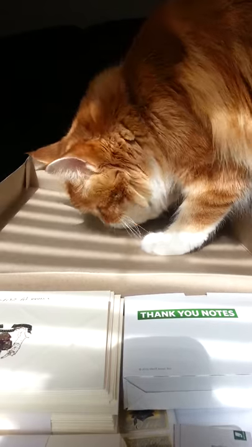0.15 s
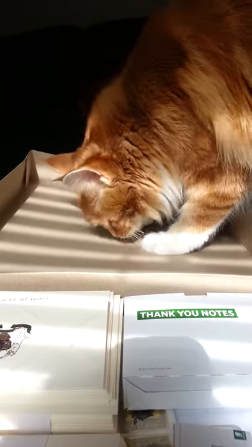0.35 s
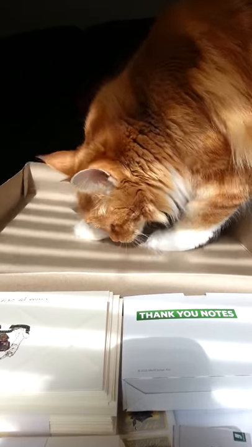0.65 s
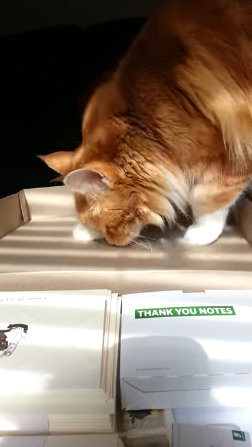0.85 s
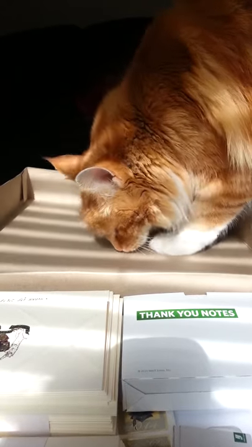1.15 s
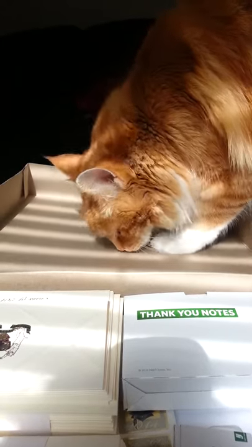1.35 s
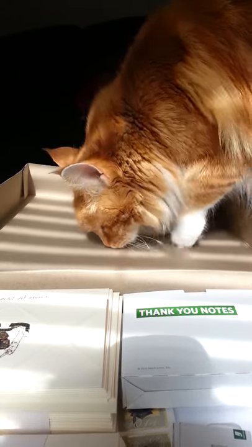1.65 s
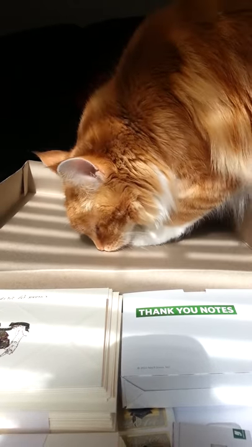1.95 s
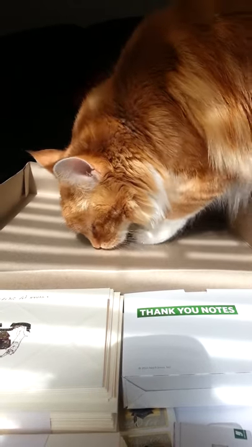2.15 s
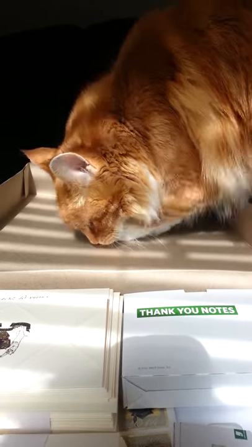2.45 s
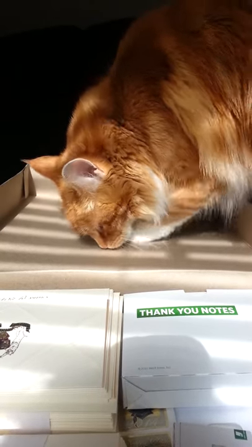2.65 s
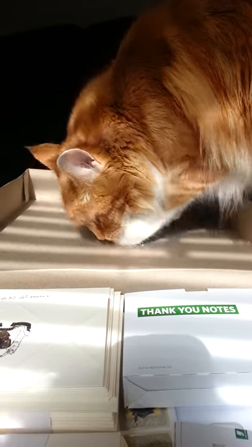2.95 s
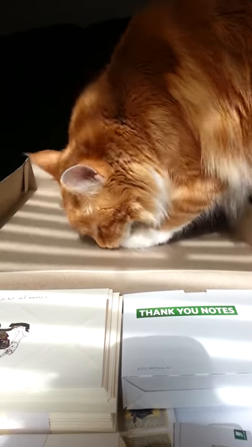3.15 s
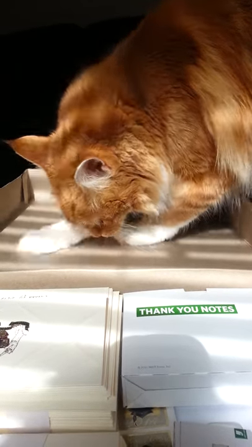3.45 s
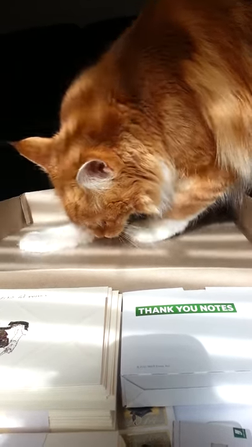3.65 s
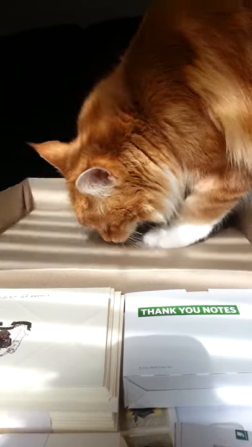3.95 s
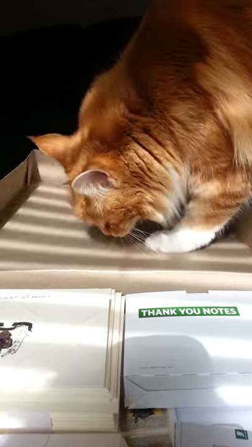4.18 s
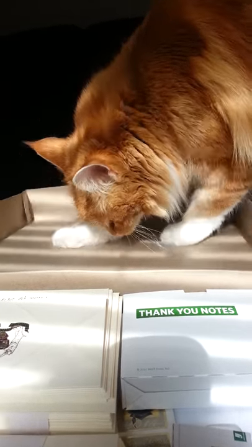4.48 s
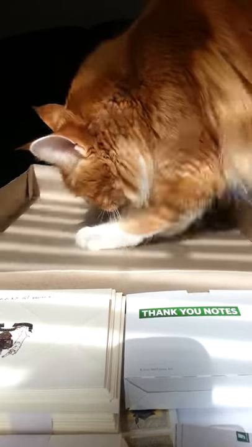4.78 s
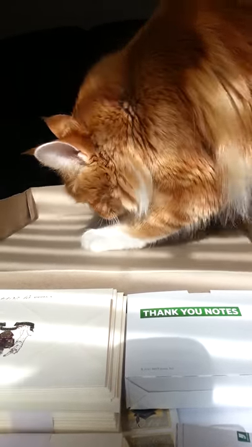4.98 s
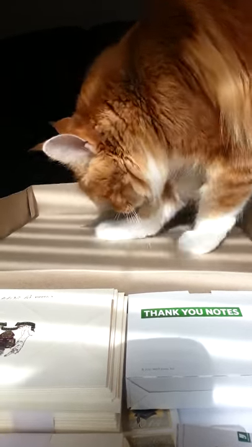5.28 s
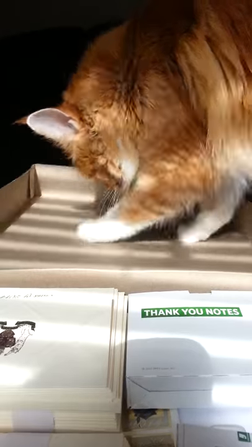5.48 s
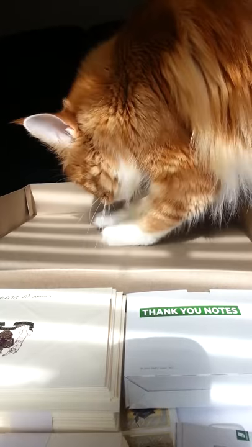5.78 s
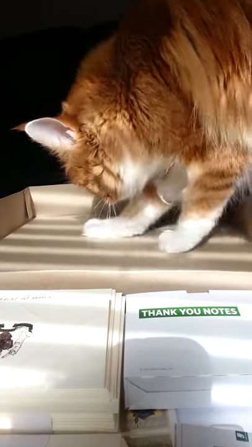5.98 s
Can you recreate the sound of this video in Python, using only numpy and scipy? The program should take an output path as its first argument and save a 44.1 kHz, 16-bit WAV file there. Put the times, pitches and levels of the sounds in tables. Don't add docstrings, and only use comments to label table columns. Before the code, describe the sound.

Close, dry scratching of cat claws and pads on cardboard, sparse at first, then busier and louder, over a faint room hum and hiss.

```python
import sys
import numpy as np
from scipy import signal
from scipy.fft import rfft, irfft, next_fast_len
from scipy.io import wavfile
from scipy.ndimage import uniform_filter1d

SR = 44100
rng = np.random.default_rng(int(sys.argv[2]) if len(sys.argv) > 2 else 0)


def linear_from_db(decibels):
    return 10 ** (np.asarray(decibels, float) / 20)


def file_out(sig):
    cols = np.atleast_2d(sig).T
    lim = np.clip(cols, -1, 1)
    pcm = np.round(lim * 32767).astype(np.int16)
    wavfile.write(sys.argv[1], SR, pcm)


N = 269892


def rms_one(x):
    return x / np.sqrt(np.mean(x ** 2) + 1e-20)


def drift(rate):
    hop = 40
    pole = np.exp(-2 * np.pi * rate * hop / SR)
    noise = rng.standard_normal(N // hop + 2002)
    slow = signal.lfilter([1], [1, -2 * pole, pole * pole], noise)[2000:]
    return np.interp(np.arange(N) / hop, np.arange(len(slow)), rms_one(slow))


def grains(size, per_s, spread_db):
    heights = linear_from_db(spread_db * np.minimum(rng.exponential(1, size), 4))
    signs = rng.choice([-1, 1], size)
    return heights * signs * (rng.random(size) < per_s / SR) + 1e-18


def resonate(x, hz, width_hz):
    r = np.exp(-np.pi * width_hz / SR)
    poles = [1, -2 * r * np.cos(2 * np.pi * hz / SR), r * r]
    return signal.lfilter([(1 - r * r) / 2, 0, (r * r - 1) / 2], poles, x)


def ring(push, hz, t60_s):
    r, w = linear_from_db(-60 / (t60_s * SR)), 2 * np.pi * hz / SR
    return signal.lfilter([0, np.sin(w)], [1, -2 * r * np.cos(w), r * r], push)


def colour(x, points):
    hz, db = np.transpose(points)
    size = next_fast_len(N)
    bins_hz = np.arange(1, size // 2 + 2) * SR / size
    gain_db = np.interp(np.log(bins_hz), np.log(hz), db)
    return rms_one(irfft(rfft(x, size) * linear_from_db(gain_db), size)[:N])


def add(out, at_s, sound):
    start = round(at_s * SR)
    out[start:start + len(sound)] += sound[:N - start]


def tone(hz, level_db):
    phase = 2 * np.pi * np.cumsum(hz + np.zeros(N)) / SR
    return linear_from_db(level_db) * np.sqrt(2) * np.sin(phase)


def background():
    # frequency in Hz, density in dB per Hz.
    quiet = [(20, -47), (45, -19), (90, -8), (200, -4.5), (300, -8.5), (470, -9.5), (900, -20.5),
             (1800, -22.5), (3500, -26), (4800, -27), (6300, -29.5), (8500, -26), (12000, -26.5),
             (14700, -26.5)]
    # frequency in Hz, width in Hz, rms level in dB.
    drones = [(116.4, 11, -84), (206.6, 77, -67.5), (225.6, 18, -71.5), (300.4, 77, -69)]
    out = linear_from_db(-53) * colour(rng.standard_normal(N), quiet)
    out += tone(120, -61.5 + 1.3 * drift(6))
    out += tone(198 + 3 * drift(8.1), -61.5 + 1.5 * drift(8))
    white = rng.standard_normal(N)
    for hz, width_hz, level_db in drones:
        narrow = resonate(resonate(white, hz, width_hz), hz, width_hz)
        out += linear_from_db(level_db) * rms_one(narrow)
    return out


def ducking(foreground):
    from_db, slope_db_per_db, span_db = -55, 0.19, 14
    level_db = 10 * np.log10(uniform_filter1d(foreground ** 2, size=4410) + 1e-12)
    return linear_from_db(-slope_db_per_db * np.clip(level_db - from_db, 0, span_db))


def room(x):
    t60_s, wall_cut_hz, gap_s = 0.11, 2200, 0.003
    t = np.arange(SR // 4) / SR
    dull = np.exp(-2 * np.pi * wall_cut_hz / SR)
    tail = signal.lfilter([1], [1, -dull], rng.standard_normal(len(t)))
    tail = tail * linear_from_db(-60 * t / t60_s) * (t > gap_s)
    return signal.fftconvolve(x, tail / np.sqrt(np.sum(tail ** 2)))[:N]


def struck(rows, contact_s, rattle_db):
    out, t = np.zeros(N), np.arange(SR // 4) / SR
    contact = np.sin(np.pi * np.minimum(t / contact_s, 1)) ** 2 * 2 / (contact_s * SR)
    for at_s, level_db, first_hz, second_hz, second_db, t60_s in rows:
        rattle = linear_from_db(rattle_db - 25 * t / t60_s) * rng.standard_normal(len(t))
        push = contact + rattle
        modes = ring(push, first_hz, t60_s) + linear_from_db(second_db) * ring(push, second_hz, t60_s)
        add(out, at_s, linear_from_db(level_db) * modes)
    return out


def bumps():
    # time in seconds, peak in dB, first mode in Hz, second mode in dB, t60 in seconds.
    bump_rows = [(0.990, -44, 148, -11, .061), (2.850, -47, 260, 2, .06), (3.505, -36, 347, -18, 0.041),
                 (3.859, -31, 216, -18, 0.092), (3.864, -26.5, 302, -9.5, 0.054),
                 (3.9664, -21.5, 235, -2, 0.11), (3.991, -25, 308, -7, 0.02),
                 (4.624, -36.5, 193, -20, 0.058), (4.846, -32, 236, -2, .065),
                 (5.565, -31.5, 173, -10, 0.054), (5.5646, -25, 360, -18, 0.038)]
    mode_ratio = 1.3
    rows = [(at_s, level_db, hz, mode_ratio * hz, second_db, t60_s)
            for at_s, level_db, hz, second_db, t60_s in bump_rows]
    return struck(rows, contact_s=0.0015, rattle_db=-35.5)


def snaps():
    # time in seconds, peak in dB, first mode in Hz, second mode in Hz, second mode in dB.
    snap_rows = [(0.283, -41.5, 2560, 4200, -5), (0.729, -56, 1500, 3000, -6),
                 (2.5782, -21, 2000, 3500, -25), (2.820, -32, 600, 1600, -4.5),
                 (2.830, -34, 1340, 2300, -4), (2.8316, -26, 514, 910, -16), (3.4988, -19, 1590, 3700, -11),
                 (2.0262, -36, 2520, 4970, -2), (2.0335, -30.5, 890, 1800, -0.5),
                 (4.3554, -23, 1780, 4200, -4.5), (4.3564, -15.5, 1830, 1460, -3),
                 (4.6255, -32, 2500, 3800, -12), (5.5634, -32, 6900, 4600, -5),
                 (3.4987, -40, 7500, 2920, 10), (5.5624, -16.5, 3040, 1330, -3),
                 (5.685, -40.5, 2000, 2300, -6)]
    t60_s = 0.012
    return struck([(*row, t60_s) for row in snap_rows], contact_s=0.0001, rattle_db=-29)


def rakes():
    # peak time in seconds, rms level in dB, fall in seconds,
    # flute resonance in Hz, brightness in dB.
    swells = [(0.119, -51, 0.029, 3930, -7), (0.728, -56, 0.034, 2500, 3), (1.031, -44.5, 0.039, 1500, -3),
              (1.610, -48.5, 0.019, 2700, -6.5), (1.629, -40, .016, 1680, -4),
              (2.567, -37.5, .012, 1900, -2), (2.585, -36, 0.025, 1900, -5), (2.587, -39, 0.014, 1070, -11),
              (4.3711, -26.5, 0.0087, 1780, -15.5), (4.652, -39, 0.051, 1420, 1),
              (4.671, -33.5, 0.014, 1600, 8), (4.820, -40, .008, 3050, -6)]
    flicks = [(2.015, -43.5, 0.016, 4670, -1), (2.028, -41, 0.029, 1020, -5),
              (2.089, -46.5, .0018, 2520, -1), (3.208, -36, 0.019, 2150, -9.5), (3.232, -59, 0.06, 1670, 0),
              (3.502, -47, 0.0073, 2700, 2), (3.508, -41, 0.0094, 1000, -9), (3.8973, -32, 0.022, 2100, 10),
              (4.1009, -28, 0.0089, 2120, -6), (4.1416, -24.5, 0.014, 3700, 0),
              (4.3632, -26, 0.0051, 1900, -16), (4.675, -30, 0.0052, 2700, -26),
              (5.5643, -25, .0039, 2630, 29), (5.570, -37.5, 0.022, 550, 1)]
    # frequency in Hz, width in Hz, level in dB.
    board_modes = [(600, 1030, -3.5), (1030, 420, -1), (1900, 520, 0), (2700, 980, 3), (3700, 810, 5.5),
                   (4600, 2800, -1), (7500, 2700, -2.5), (11500, 13000, -46)]
    rise_per_fall, flick_rise_s = 0.59, 0.0033
    out, t = np.zeros(N), np.arange(SR // 6) / SR
    rows = [(rise_per_fall * row[2], *row) for row in swells]
    rows += [(flick_rise_s, *row) for row in flicks]
    for rise_s, peak_s, level_db, fall_s, flute_hz, bright_db in rows:
        rise = (t / rise_s) ** 0.77
        fall = np.exp(-(np.maximum(t - rise_s, 0) / fall_s) ** 1.7)
        effort = np.where(t < rise_s, rise, fall)
        clicks = grains(len(t), per_s=5500, spread_db=3.0)
        flute = rms_one(resonate(resonate(clicks, flute_hz, width_hz=340), flute_hz, width_hz=1300))
        board = np.zeros(len(t))
        for k, (hz, width_hz, db) in enumerate(board_modes):
            board += (-1) ** k * linear_from_db(db) * rms_one(resonate(clicks, hz, width_hz))
        torn = rms_one(effort * (flute + linear_from_db(bright_db) * board))
        add(out, peak_s - rise_s, linear_from_db(level_db) * np.sqrt(np.mean(effort ** 2)) * torn)
    return out


def board_ring(x):
    t60_s, level_db = 0.02, -7
    out, step, t = x.copy(), SR // 18, np.arange(SR // 20) / SR
    window = np.sin(np.pi * np.arange(2 * step) / (2 * step))
    for start in range(0, N, step):
        modes = rng.standard_normal(len(t)) * linear_from_db(-60 * t / t60_s)
        piece = x[start:start + 2 * step]
        rung = signal.fftconvolve(piece * window[:len(piece)], modes / np.sqrt(np.sum(modes ** 2)))
        add(out, start / SR, linear_from_db(level_db) * rung)
    return out


def pressure_and_claws():
    # start in seconds, end in seconds, start pressure in dB, end pressure in dB,
    # claw share in dB.
    stroke_rows = [(0, 0.096, -59, -57, -2), (0.1, 0.344, -51.5, -63, -1), (0.46, 0.585, -58.5, -52.5, -2),
                   (0.687, 0.797, -57.5, -56, -1), (.81, 0.915, -49, -52.5, -2),
                   (1.004, 1.356, -54, -57.5, 0.5), (2.06, 2.225, -74, -63, -2),
                   (2.602, 2.877, -55.5, -51.5, -1), (3.073, 3.10, -60.5, -61, -3.5),
                   (3.17, 3.249, -56.5, -49.5, 1), (3.42, 3.548, -66, -57.5, -0.5),
                   (3.572, 3.845, -56, -50.5, -1.5), (3.861, 4.075, -44.5, -48, 2),
                   (4.07, 4.145, -46, -41, -0.5), (4.18, 4.265, -57, -65, 0.5), (4.42, 4.61, -57, -53, -1),
                   (4.645, 4.79, -47, -46.5, 2), (4.803, 4.893, -42.5, -44.5, -1),
                   (5.083, 5.183, -50, -49.5, 1.5), (5.169, 5.356, -46, -48, 0),
                   (5.396, 5.56, -47, -41.5, 2), (5.58, 5.68, -54, -54, -0.5),
                   (5.814, 5.925, -46.5, -51, 2), (5.898, 6.099, -46, -53, 1.5)]
    land_db_per_s, lift_db_per_s, arch_db = 434, 373, 2.5
    rest_db, settle_s = -69, 0.04
    t = np.arange(0, N, 32) / SR
    power, claws, progress = linear_from_db(2 * rest_db) + 0 * t, 0, 0
    for start_s, end_s, start_db, end_db, claw_db in stroke_rows:
        along = np.clip((t - start_s) / (end_s - start_s), 0, 1)
        settled = 1 - np.exp(-np.maximum(t - start_s, 0) / settle_s)
        db = start_db + (end_db - start_db) * along + arch_db * np.sin(np.pi * along)
        db -= land_db_per_s * np.maximum(start_s - t, 0)
        db -= lift_db_per_s * np.maximum(t - end_s, 0)
        weight = linear_from_db(2 * db)
        power = power + weight
        claws = claws + claw_db * weight
        progress = progress + settled * weight
    curves = (10 * np.log10(power), claws / power, progress / power)
    return [np.interp(np.arange(N) / SR, t, curve) for curve in curves]


def shoves_db():
    # time in seconds, length in seconds, gain in dB.
    shove_rows = [(0.334, 0.066, 5), (0.623, 0.033, 7), (.72, 0.055, 8), (1.27, 0.045, 6.5),
                  (2.077, .05, 8), (3.33, 0.065, 4.5), (3.563, 0.15, 4.5), (4.237, 0.1, 6.5),
                  (4.488, .06, 3.5), (4.963, .05, 5), (5.222, 0.031, 2.5), (5.777, 0.024, 4),
                  (5.954, 0.049, 5.5), (6.093, 0.092, 4)]
    t = np.arange(N) / SR
    return sum(db * np.exp(-((t - at_s) / length_s) ** 2) for at_s, length_s, db in shove_rows)


def strokes():
    # frequency in Hz, density in dB per Hz.
    rasp_spectrum = [(700, -11.5), (1000, -8.5), (1500, 0), (2100, 1), (2400, -2.5), (2750, 1),
                     (3100, -5.5), (3600, -23.5)]
    squeak_spectrum = [(2600, -30), (3050, -10.5), (3350, -4.5), (3650, -1), (3950, -4), (4400, -4),
                       (4900, -8.5), (6000, -29)]
    fur_spectrum = [(3500, -19), (5000, 1), (6200, 1.5), (7800, 3), (9700, 0), (13400, 0), (14400, -3),
                    (14700, -1.5)]
    drag_spectrum = [(60, -60), (150, -22), (300, 0), (500, -6), (900, -4.5), (1300, -9.5), (2000, -24)]
    usual_db = -51.5
    press_db, claw_db, settled = pressure_and_claws()

    def layer_db(at_usual_db, per_press_db, per_claw_db, settling_db):
        pressed_db = at_usual_db + per_press_db * (press_db - usual_db)
        return pressed_db + per_claw_db * claw_db + settling_db * settled

    rasp_db = layer_db(-51.5, 0.7167, 1.5, -1)
    squeak_db = layer_db(-54, 1.0, 0.14, -0.3)
    fur_db = layer_db(-52.5, 1.1669, -0.2, 1.5)
    drag_db = layer_db(-56, 0.39, -0.4, 1) + shoves_db()
    uneven = drift(6.7)
    fibres = board_ring(grains(N, per_s=6000, spread_db=0.5))
    hairs = grains(N, per_s=20000, spread_db=2.0)
    rasp = colour(fibres, rasp_spectrum) * linear_from_db(rasp_db + 0.18 * uneven + 1.4 * drift(60))
    squeak = colour(fibres, squeak_spectrum) * linear_from_db(squeak_db + 0.077 * uneven + 0.64 * drift(50))
    fur = colour(hairs, fur_spectrum) * linear_from_db(fur_db + 1.4 * uneven)
    drag = colour(rng.standard_normal(N), drag_spectrum) * linear_from_db(drag_db + 1.85 * drift(17))
    return rasp + squeak + fur + drag


def scene():
    mic_low_cut = signal.butter(3, 101, "high", fs=SR, output="sos")
    hits = signal.sosfilt(mic_low_cut, rakes() + snaps() + bumps())
    paws = strokes()
    room_db = -15
    mono = hits + linear_from_db(room_db) * room(hits) + paws + ducking(paws) * background()
    return np.array([mono, mono])


def splits(x):
    # time in seconds, band centre in Hz.
    split_rows = [(.055, 7500), (.055, 10300), (.17, 11300), (.96, 11600), (1.425, 9600), (1.775, 13000),
                  (2.67, 7500), (2.68, 4600), (4.765, 4850), (4.765, 10600), (4.765, 13700), (5.03, 12400),
                  (5.19, 8200), (5.42, 4600), (5.98, 12000)]
    half_hz, level_db, size = 750, -3, 1500
    out, window = np.zeros(N), signal.windows.tukey(size, 0.6)
    for at_s, hz in split_rows:
        band = signal.butter(6, [hz - half_hz, hz + half_hz], "band", fs=SR, output="sos")
        start = round(at_s * SR) - size // 2
        strength = np.std(signal.sosfilt(band, x[start:start + size]))
        noise = rms_one(signal.sosfilt(band, rng.standard_normal(size)))
        add(out, start / SR, linear_from_db(level_db) * strength * window * noise)
    return out


def band_limit(x):
    return signal.sosfilt(signal.butter(12, 14850, fs=SR, output="sos"), x)


def record(dry):
    wide = dry + splits(dry[0]) * [[1], [-1]]
    top_cut = signal.ellip(16, 0.3, 70, 14540, fs=SR, output="sos")
    return band_limit(signal.sosfilt(top_cut, wide))


dry = scene()
out = record(dry)
file_out(out)
```